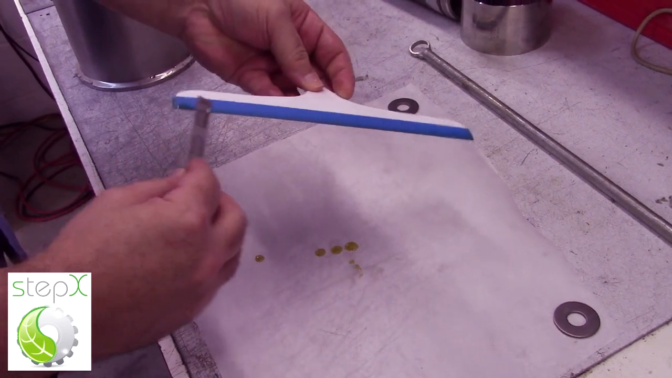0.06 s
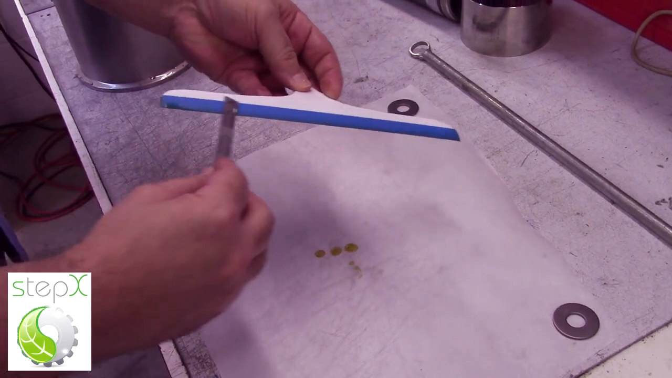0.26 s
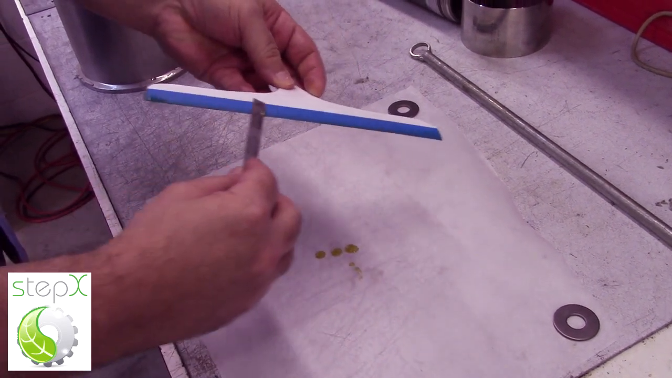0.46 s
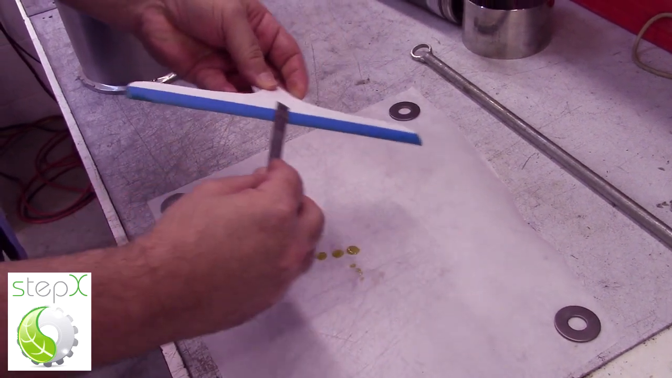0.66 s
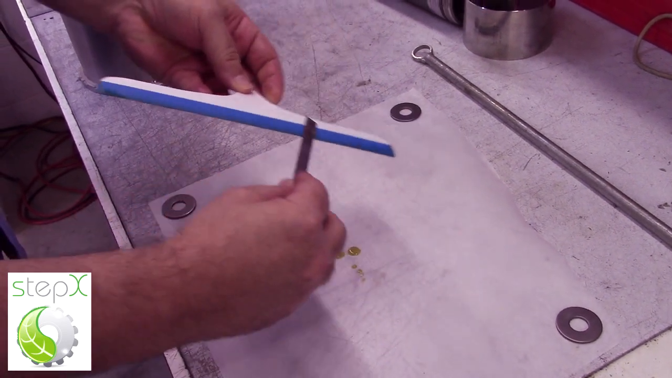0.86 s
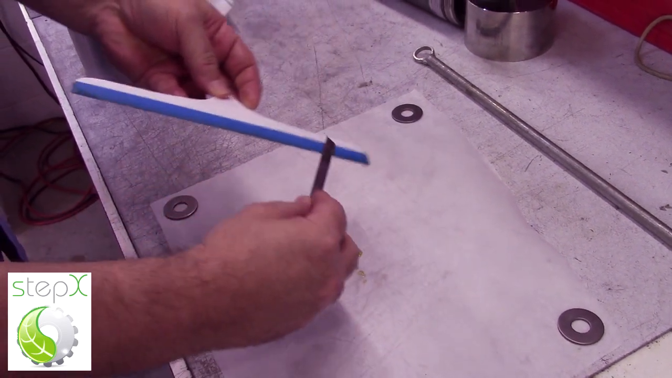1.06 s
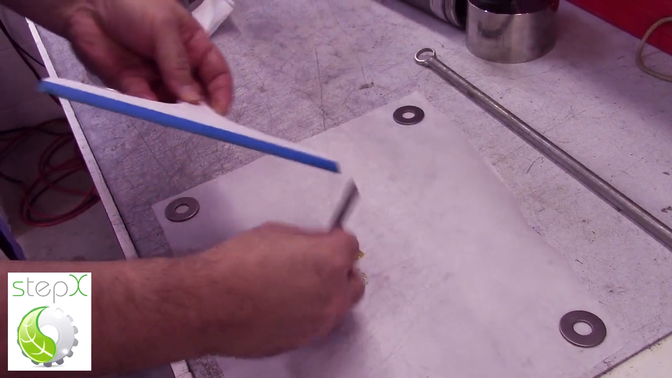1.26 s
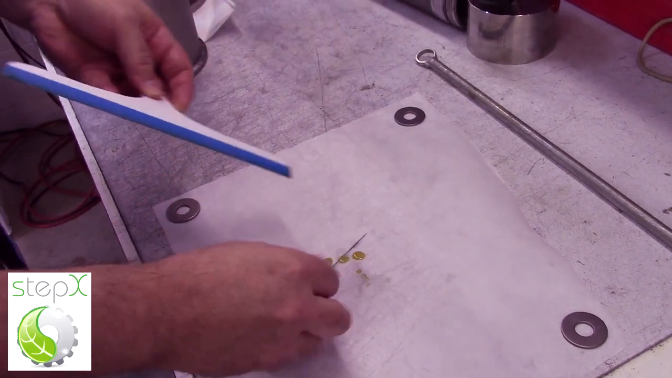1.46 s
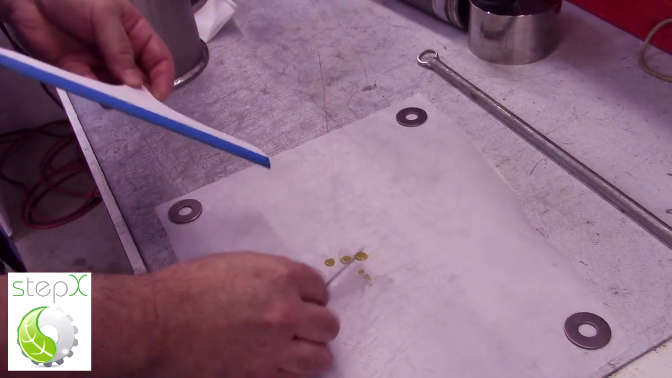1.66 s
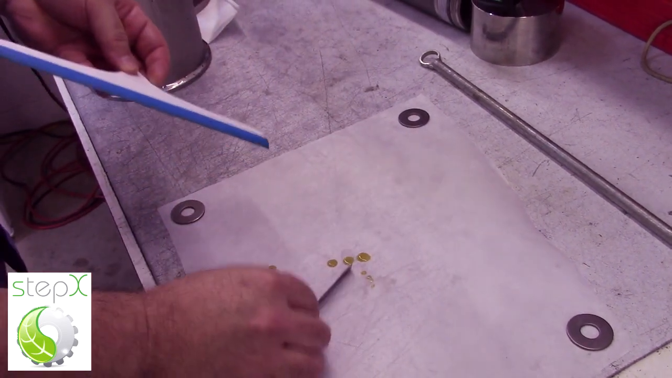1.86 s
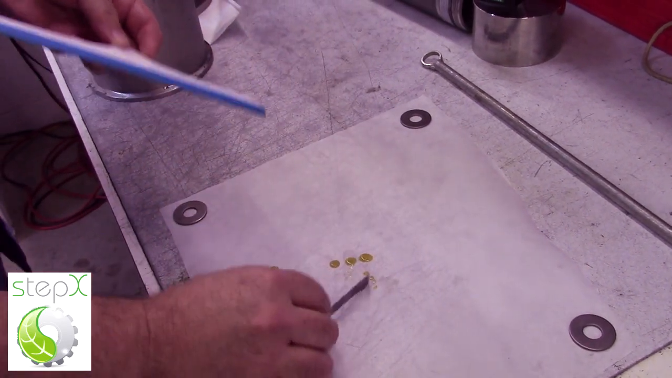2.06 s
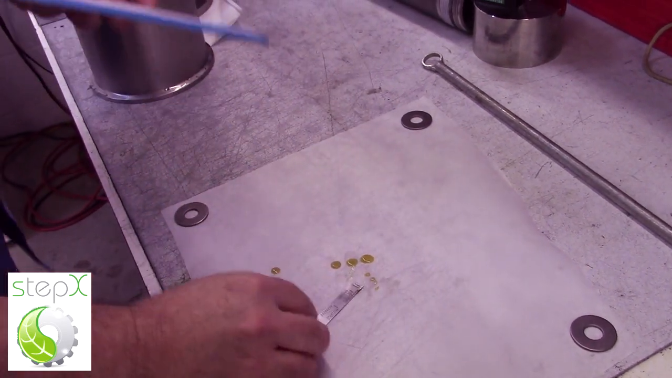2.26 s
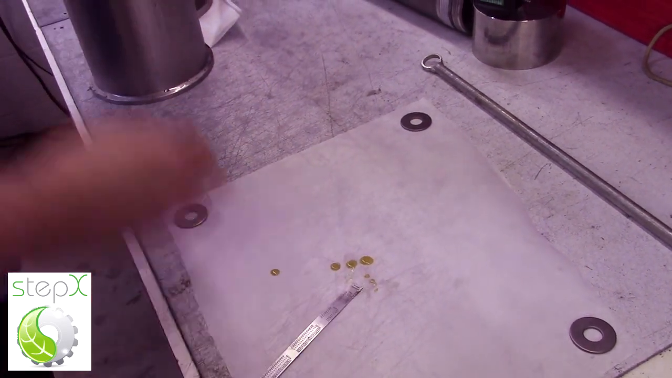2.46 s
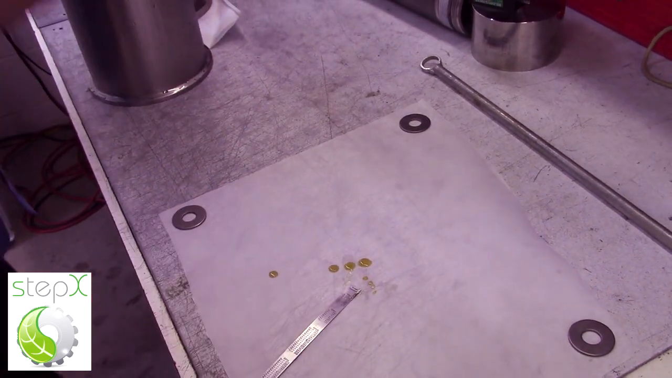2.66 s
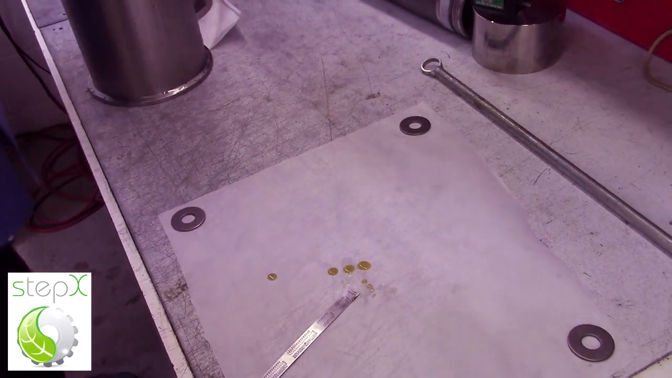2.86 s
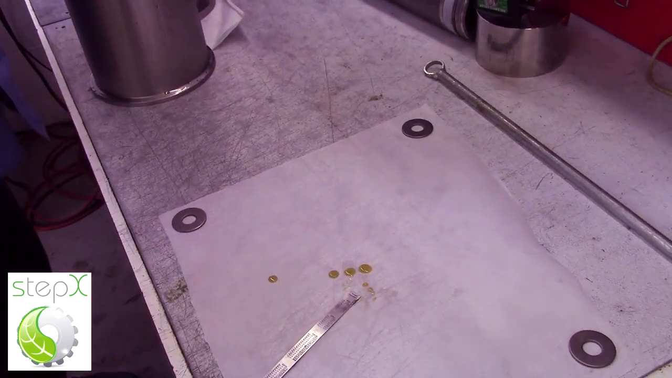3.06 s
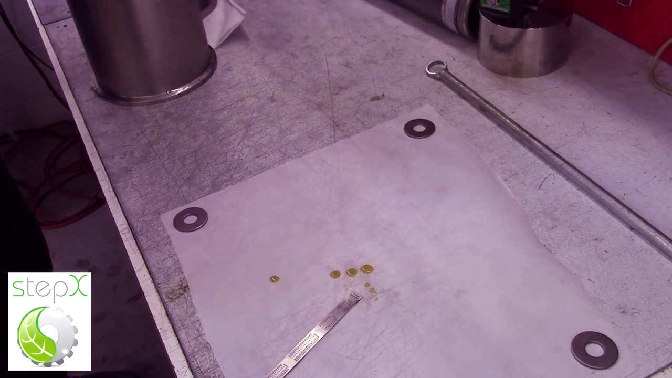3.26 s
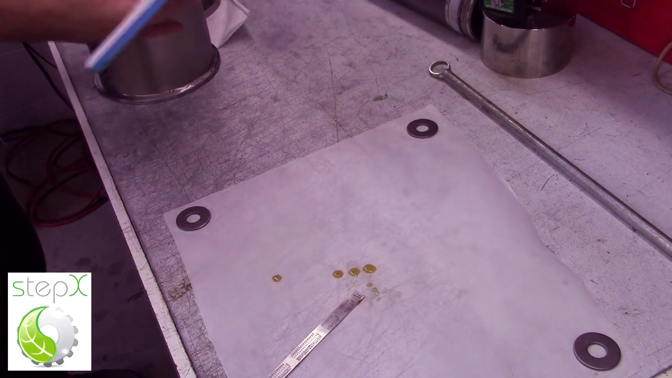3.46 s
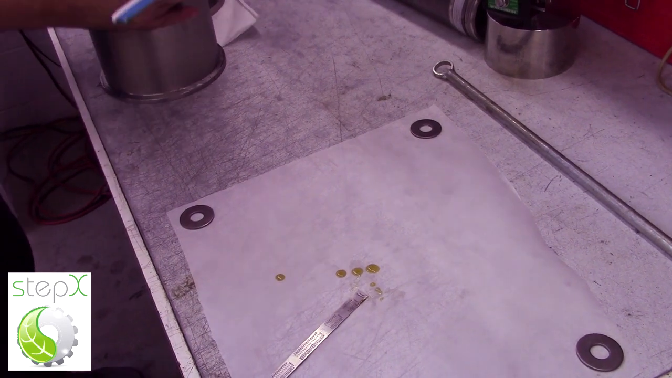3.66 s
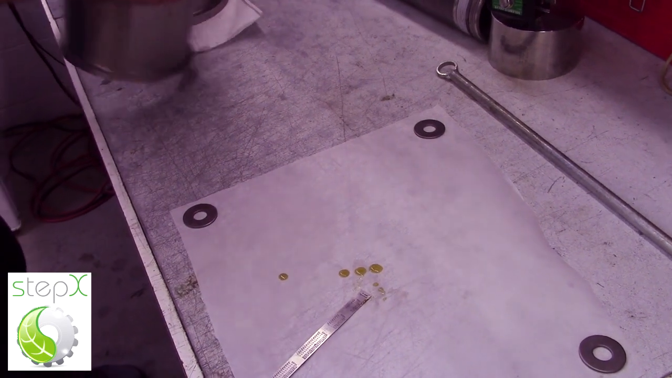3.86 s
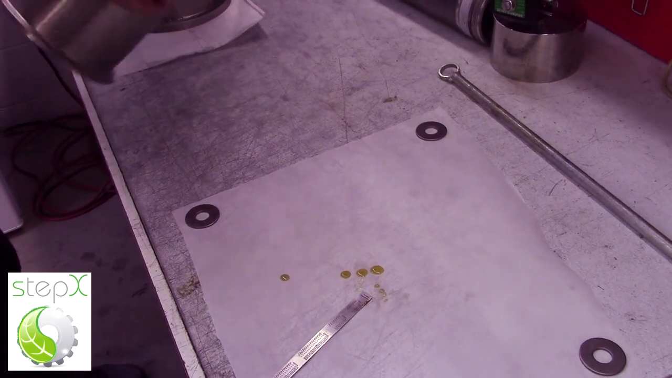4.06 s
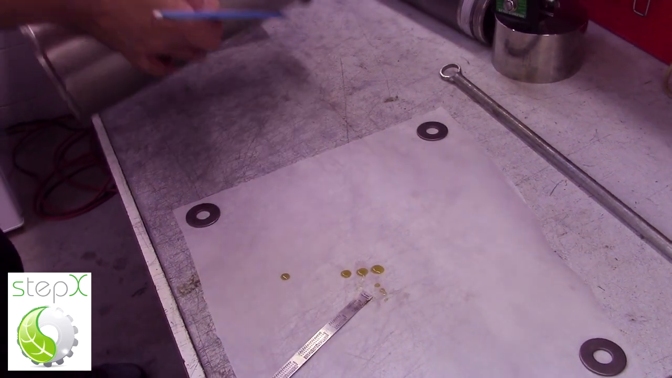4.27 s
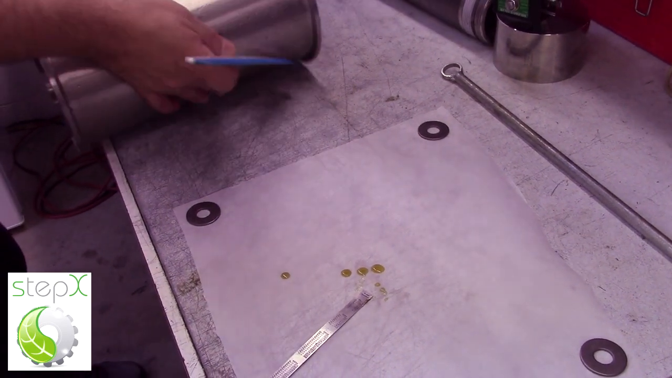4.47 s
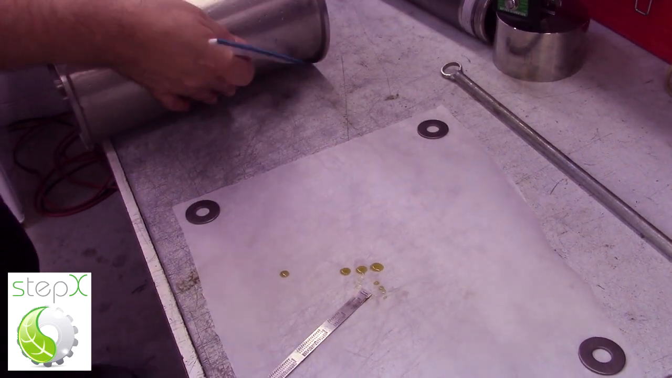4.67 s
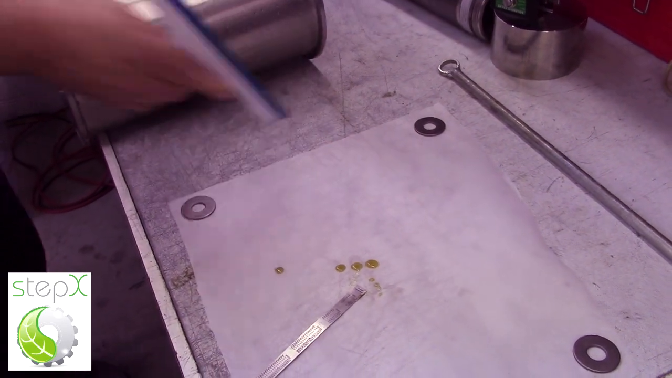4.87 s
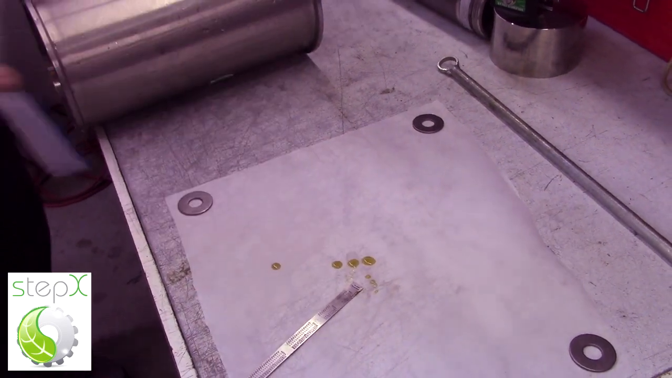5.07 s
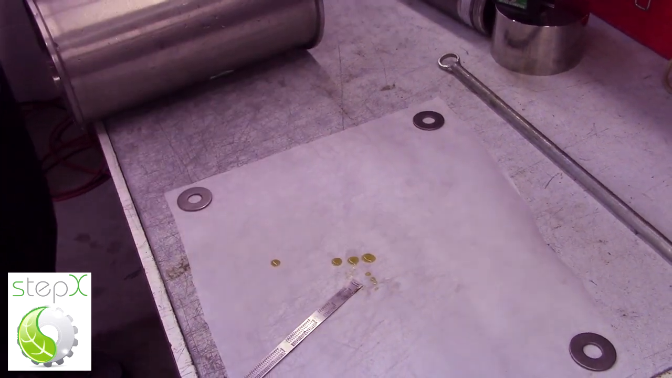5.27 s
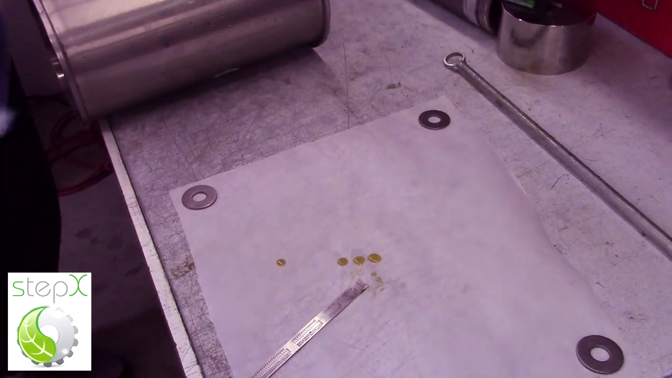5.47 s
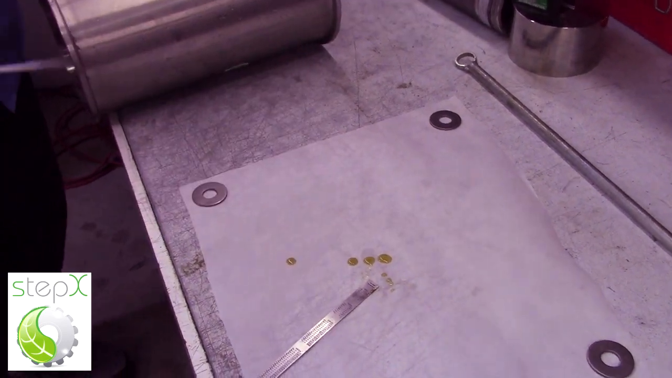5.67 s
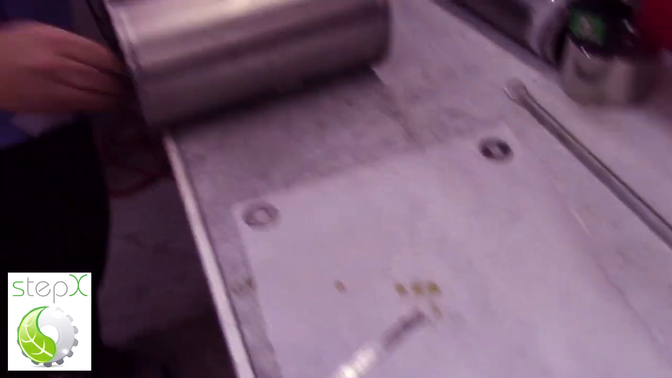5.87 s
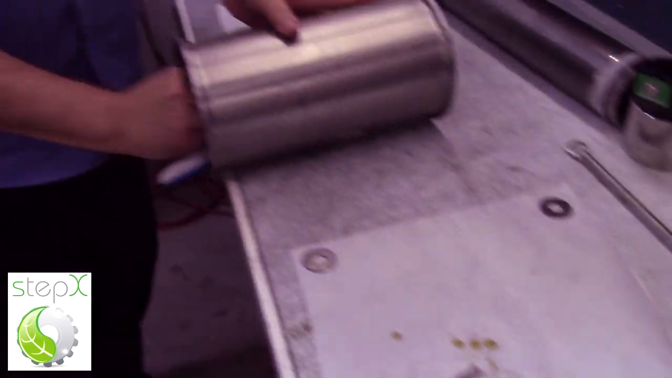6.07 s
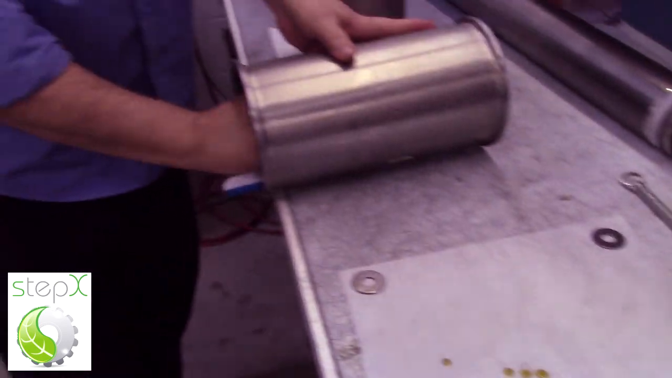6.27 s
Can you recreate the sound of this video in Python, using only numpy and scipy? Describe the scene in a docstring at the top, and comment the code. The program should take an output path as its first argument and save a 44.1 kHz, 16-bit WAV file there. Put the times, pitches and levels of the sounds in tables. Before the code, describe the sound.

A close stereo microphone catches a blade rubbing quietly along a squeegee, then dropping in several dry, bright taps on a metal bench. After a pause of sleeve friction and soft handling rumble, a hollow stainless vessel gives a brief ringing clink and comes down heavily, its bright clank joined by a deep sheet-metal boom. Small ticks and bumps follow over ventilation, hum and a rising motor, with short diffuse room echoes.

```python
"""Steel blade and vessel in a workshop

A thin steel blade is wiped on a squeegee (uneven friction noise) and dropped on a paper-covered metal worktop,
where it clatters (clicks, decaying modes, noise). A stainless steel vessel is picked up, clinks (wall modes) and
is laid on its side with a clank that makes the worktop boom (low modes, noise). Diffuse echoes of a small
workshop, ventilation noise, hum and a motor gathering speed surround it; the microphone is close."""
import sys
import numpy as np
from scipy import signal
from scipy.fft import rfft, irfft, next_fast_len
from scipy.io import wavfile
from scipy.ndimage import uniform_filter1d

SR = 44100
rng = np.random.default_rng(int(sys.argv[2]) if len(sys.argv) > 2 else 0)


def materialize(psi):
    """Save the field psi as 16-bit PCM at rate SR to the path in sys.argv[1].

    A 1-D psi becomes a single channel; in a 2-D psi each row is a channel.
    """
    bounded = np.clip(np.atleast_2d(psi).T, -1, 1)
    quanta = np.round(bounded * 32767).astype(np.int16)
    wavfile.write(sys.argv[1], SR, quanta)


N = 278271
TIME = np.arange(N) / SR
SHORT, MEDIUM, LONG = SR // 5, SR * 3 // 5, SR * 6 // 5  # sound lengths in samples: 0.2, 0.6, 1.2 s

# stereo width of close sounds: f/Hz, side minus mid level/dB
CLOSE_WIDTH = [(30, -22), (150, -25), (500, -17), (2000, -14), (8000, -10), (14000, -8)]
# modes of the vessel wall: f/Hz, level/dB, t60/s before the ring length factor
VESSEL_MODES = [(1120, -20, .2), (1717, -12, .42), (2356, -12, .3), (2419, 0, .17), (2424, -13, .36),
                (3225, -14, .36), (3273, -18, .26), (3545, -17, .22), (3946, -21, .3), (4093, -7, .16),
                (4388, -8, .22), (4720, -4, .15), (4957, -5, .15), (5110, -6, .12), (5846, -7, .16),
                (6169, -17, .22), (6304, -11, .15), (6627, -14, .16), (6800, -15, .15), (7564, -15, .17),
                (7790, -18, .2), (8750, -17, .13), (9227, -19, .15), (9480, -13, .11), (10390, -23, .18),
                (11120, -16, .11)]


def from_db(db):
    """Decibels to amplitude."""
    return 10 ** (np.asarray(db) / 20)


def rms_one(x):
    """Scale to an rms of 1."""
    return x / np.sqrt(np.mean(x ** 2) + 1e-20)


def at_hz(points, hz):
    """Read a table on a log-frequency axis."""
    known_hz, values = np.transpose(points)
    return np.interp(np.log(np.maximum(hz, 1)), np.log(known_hz), values)


def add(out, s, sound):
    """Mix a sound in at time s."""
    start = round(s * SR)
    out[:, start:start + sound.shape[-1]] += sound[..., :N - start]


def panned(x, left_db):
    """Make the left channel left_db louder against the right."""
    return x * from_db(np.array([[left_db], [-left_db]]) / 2)


def dying(t60, size):
    """Envelope that loses 60 dB in t60 seconds."""
    return np.exp(-np.log(1000) * TIME[:size] / t60)


def noise(colour, size=N, width=CLOSE_WIDTH):
    """Stereo noise of a given spectrum and of a width that depends on frequency; rms 1."""
    padded = next_fast_len(size, real=True)
    hz = np.fft.rfftfreq(padded, 1 / SR)
    mid, side = rfft(rng.standard_normal((2, padded))) * from_db(at_hz(colour, hz))
    side = side * from_db(at_hz(width, hz))
    left_right = irfft(mid + side * [[1], [-1]], padded)
    return rms_one(left_right[:, :size])


def puff(colour, t60):
    """Noise that starts at once and dies evenly."""
    return noise(colour, size=SHORT) * dying(t60, size=SHORT)


def burst(colour, decays, width=CLOSE_WIDTH, size=MEDIUM):
    """Countless modes struck at once: noise whose octaves die at their own rates."""
    spectrum = rfft(noise(colour, size=size, width=width))
    hz = np.fft.rfftfreq(size, 1 / SR)
    centres = 62.5 * 2 ** np.arange(9)
    out = 0
    for centre, own in zip(centres, np.eye(len(centres))):
        weight = at_hz(np.c_[centres, own], hz)  # 1 at its own centre, 0 at the neighbours
        band = irfft(spectrum * weight, size)
        out = out + band * dying(at_hz(decays, centre), size=size)
    return out


def ring(modes, spread_db, size, length=1, place=0):
    """One blow: decaying sines with scattered strengths, and signs set by the place struck."""
    hz, db, t60 = np.transpose(modes)
    level, side = rng.standard_normal((len(modes), 2)).T
    sign = np.sign(np.cos(np.pi * place * hz))
    strength = sign * from_db(db + spread_db * level)
    # high modes differ more between the channels
    balance = 1 + side * from_db(at_hz(CLOSE_WIDTH, hz)) * [[1], [-1]]
    sines = np.sin(2 * np.pi * hz[:, None] * TIME[:size])
    return (strength * balance) @ (sines * dying(t60[:, None] * length, size=size))


def radiate(x, corner_hz):
    """A plate hardly radiates waves longer than itself: a steep high-pass."""
    return signal.sosfilt(signal.butter(3, corner_hz, "high", fs=SR, output="sos"), x)


def strokes(rows, swell, release_s):
    """Strength of sliding movements: each swells over a share of its length, holds, then fades."""
    power = 0
    for start, length, db in rows:
        rise = np.clip((TIME - start) / (swell * length), 0, 1)
        fall = np.exp(-np.clip((TIME - start - length) / release_s, 0, 20))
        power = power + (from_db(db) * rise * fall) ** 2
    return np.sqrt(power)


def rubbing(strength, colour, grain_db):
    """Friction noise, made uneven by tiny catches and slips."""
    catches = rms_one(uniform_filter1d(rng.standard_normal(N), size=130))
    return strength * rms_one(noise(colour) * from_db(grain_db * catches))


def machines():
    """Ventilation noise with a softened treble, a steady hum of a few sines, and a motor."""
    # hum: f/Hz, rms level/dB
    hum_tones = [(75.4, -81), (242.2, -70), (360.7, -75), (479.1, -73)]
    # spectrum of the ventilation: f/Hz, level per Hz/dB
    air_colour = [(12, -38), (20, -2), (32, -18), (70, 1.5), (141, -6.5), (240, -3), (268, -6.5), (355, -7),
                  (443, -12.5), (482, -8), (554, -12.5), (754, -13.5), (1150, -17.5), (3600, -24),
                  (15800, -32)]
    # stereo width of diffuse sound: f/Hz, side minus mid level/dB
    far_width = [(60, -8), (150, -1.5), (380, 2.5), (950, 3), (2380, 1), (5980, 0), (15000, -1)]
    air_db = -54.5  # rms ahead of the low-pass
    low_pass = signal.butter(1, 14000, fs=SR, output="sos")
    air = signal.sosfilt(low_pass, from_db(air_db) * noise(air_colour, width=far_width))
    hum = sum(from_db(db) * np.sin(2 * np.pi * (hz * TIME + rng.random())) for hz, db in hum_tones)
    return air + np.sqrt(2) * (hum + motor())  # sqrt(2): rms to peak of a sine


def motor():
    """Unbalance grows with the square of the speed and shakes the mounting once and twice a turn."""
    # resonances of the mounting, which swell as the speed sweeps through them:
    # f/Hz, half-width at half amplitude/Hz, level/dB
    mounting = [(36.2, 2.8, -52), (61.55, 1.73, -48.5), (69.5, 2.6, -63.5), (97.7, 4.4, -48.5),
                (116.8, 8.8, -46.5), (131.6, 1.6, -57)]
    start_s, top_hz, lag_s = .625, 80.5, 1.7  # start, final turns per second, time constant
    second_order_db = -6
    speed = 1 - np.exp(-np.maximum(TIME - start_s, 0) / lag_s)  # share of top speed
    out = 0
    for order, order_db in enumerate((0, second_order_db), 1):
        shake_hz = order * top_hz * speed
        power = 0
        for hz, width, db in mounting:
            power = power + from_db(db) ** 2 / (1 + ((shake_hz - hz) / width) ** 2) ** 2
        shaking = np.sin(2 * np.pi * np.cumsum(shake_hz) / SR)
        out = out + from_db(order_db) * np.sqrt(power) * shaking
    return speed ** 2 * out


def sleeve():
    """Cloth friction: a sleeve brushes past as the hand reaches over, above a constant faint rustle."""
    # strokes: start/s, length/s, level/dB
    passes = [(2.45, 0.73, -64), (3.09, 0.0058, -54.5), (3.135, 0.05, -56), (3.352, .008, -47.5),
              (3.36, 0.041, -44), (3.45, 0.31, -62.5)]
    # spectrum of the cloth: f/Hz, level per Hz/dB
    cloth_colour = [(120, -30), (200, -19.5), (253, 2.5), (333, -7.5), (798, -6), (1190, -13.5),
                    (1510, -18), (2060, -10), (5000, -12.5), (8350, -17.5), (9660, -20.5), (11400, -21),
                    (15500, -38)]
    rustle_db = -66  # clothes never lie quite still
    strength = np.hypot(from_db(rustle_db), strokes(passes, swell=.65, release_s=0.058))
    return rubbing(strength, cloth_colour, grain_db=2.0)


def wipe():
    """Rubber friction: the blade is wiped along the squeegee, pressing harder until it slips off."""
    # strokes: start/s, length/s, level/dB
    wipes = [(.1, .95, -66.5), (.62, .32, -61.5), (1.165, 0.068, -53.5), (1.47, 0.051, -71)]
    # spectrum of the wiping: f/Hz, level per Hz/dB
    rubber_colour = [(400, -20), (1200, -5), (1900, -10), (2600, -7), (3100, 2), (3800, -7), (6000, -12),
                     (10000, -17), (16000, -30)]
    return rubbing(strokes(wipes, swell=0.89, release_s=0.0083), rubber_colour, grain_db=1.0)


def blade(rattle_db=-16, rattle_t60=0.063, click_low_hz=2400, click_high_hz=6000):
    """Each bounce is a hard click, a short clack and a brief edge chatter, all starting together."""
    # bounces: t/s, clack level/dB, click level/dB, chatter level before halving/dB, chatter t60/s
    taps = [(1.719, -8.5, -19, -23.5, 0.038), (1.735, -49, -37, -33, 0.12), (1.8821, -8.5, -20, -22, 0.05),
            (1.8865, -26, -12, -24, 0.019), (1.8910, -12, -0.5, -11.5, 0.023),
            (2.0804, -18.5, -37, -40, .03), (2.1429, -58, -38, -29, 0.019),
            (2.1523, -28, -11, -12.5, 0.015), (2.1565, -13.5, -33, -39, .05),
            (2.2265, -28, -30, -23.5, 0.085)]
    # modes of the blade lying against the sheet: f/Hz, level/dB, t60/s
    blade_modes = [(617, -30, 0.081), (1122, -30.5, 0.075), (1774, -18, 0.062), (1800, -32, 0.11),
                   (2025, -17, 0.026), (2190, -12, 0.014), (2384, -14, 0.023), (3043, -12.5, 0.016),
                   (3670, -15, 0.019), (4520, -18, 0.006), (5350, -13.5, 0.0058)]
    # short rattle of the sheet under the blade: f/Hz, level per Hz/dB
    rattle_colour = [(100, -25), (350, -55), (600, 3), (850, -15), (1300, -8), (1850, 8), (2600, -10),
                     (3500, -1.5), (5500, -12), (15000, -55)]
    # edge chatter: f/Hz, level per Hz/dB
    chatter_colour = [(150, -20), (500, -5.5), (1000, -7.5), (2500, 5.5), (5000, -8.5), (8000, 0),
                      (11000, -9.5), (16000, -17)]
    out = np.zeros((2, N))
    band_pass = signal.butter(1, [click_low_hz, click_high_hz], "band", fs=SR)
    click = signal.lfilter(*band_pass, signal.unit_impulse(SHORT))
    click = click / click.max()
    for s, clack_db, click_db, chatter_db, chatter_t60 in taps:
        clack = ring(blade_modes, spread_db=0.5, size=SHORT)
        clack = clack + from_db(rattle_db) * puff(rattle_colour, rattle_t60)
        add(out, s, radiate(from_db(click_db) * click + from_db(clack_db) * clack, corner_hz=550))
        add(out, s, from_db(chatter_db) * puff(chatter_colour, chatter_t60) / 2)
    return panned(out, left_db=-2.0)


def handling():
    """A hollow rumble of uneven friction as the vessel is reached for, tipped and carried."""
    # movements: start/s, length/s, level/dB
    moves = [(2.55, 0.92, -64.5), (3.61, 0.13, -57), (3.84, .35, -57)]
    # spectrum of the rumble: f/Hz, level per Hz/dB
    hollow_colour = [(100, -42), (200, -3.5), (290, 4), (400, -1.5), (700, -17), (1500, -49), (5000, -67.5)]
    return rubbing(strokes(moves, swell=0.29, release_s=.07), hollow_colour, grain_db=3.0)


def bumps(skirt_db=-28):
    """Soft handling bumps: dull, damped touches of noise, each about an octave wide."""
    # bumps: t/s, level/dB, centre f/Hz
    touches = [(2.787, -45.5, 293), (2.891, -40.5, 317), (2.899, -56, 900), (3.095, -47, 600),
               (3.781, -45.5, 540), (4.313, -46, 651), (4.852, -48, 284), (6.054, -46.5, 1940),
               (6.268, -44.5, 220)]
    cycles, base_t60 = 18, .02  # t60 is a fixed time (s) plus so many cycles: low ones ring longer
    out = np.zeros((2, N))
    for s, db, hz in touches:
        colour = [(hz / 4, skirt_db), (hz / 1.3, 0), (hz * 1.3, 0), (hz * 4, skirt_db), (hz * 16, 2 * skirt_db)]
        add(out, s, from_db(db) * puff(colour, base_t60 + cycles / hz))
    return out


def singing_wall(rows, colour):
    """Friction makes the damped wall sing faintly in its lower modes: noise through their ringing."""
    damped_wall = ring(VESSEL_MODES, spread_db=1, size=SHORT, length=.45)
    wall = signal.oaconvolve(noise(colour), damped_wall, axes=1)[:, :N]
    return strokes(rows, swell=0.37, release_s=0.042) * rms_one(wall)


def fingers():
    """Fingers slide on the vessel wall, then hold it; their friction excites the wall modes."""
    # slides: start/s, length/s, level/dB
    slides = [(3.53, 0.22, -61.5), (3.8, .3, -67.5)]
    # friction on the wall: f/Hz, level per Hz/dB
    finger_colour = [(1000, -14), (1700, 0), (2400, -7), (3200, -10), (3550, 13), (4100, -12), (5200, -16),
                     (12000, -20)]
    return singing_wall(slides, finger_colour)


def vessel(contact_t60=0.02):
    """Each knock gives a short crack and sets the steel wall ringing; hand and worktop damp it."""
    # knocks: t/s, low modes level/dB, high modes level/dB, contact noise level before halving/dB,
    # ring length factor/1
    knocks = [(4.1236, -32, -37.5, -28, 1.13), (4.213, -69, -49.5, -50, 0.65),
              (4.5056, -34, -32, -7.5, .92), (4.548, -42.5, -46, -24, 1.36), (4.859, -75, -60, -60, 0.4),
              (5.0929, -57.5, -48, -37.5, 1.54)]
    # contact noise: f/Hz, level per Hz/dB
    contact_colour = [(300, -31), (1200, -12), (2200, 9), (4500, -4.5), (7500, -9.5), (11000, -22.5),
                      (16000, -23.5)]
    out, upper = np.zeros((2, N)), high_modes()
    for s, low_db, high_db, contact_db, length in knocks:
        low = ring(VESSEL_MODES, spread_db=1.5, size=MEDIUM, length=length, place=rng.random())
        high = ring(upper, spread_db=3.0, size=SHORT, length=length, place=rng.random())
        add(out, s, from_db(low_db) * low)
        add(out, s, from_db(high_db) * high)
        add(out, s, from_db(contact_db) * puff(contact_colour, contact_t60) / 2)
    return panned(radiate(out, corner_hz=800), left_db=-1)


def high_modes(count=200):
    """The crowded upper modes of the thin wall, scattered in pitch and strength: f/Hz, level/dB, t60/s."""
    # overall spectrum of these modes: f/Hz, level per Hz/dB
    shimmer_colour = [(300, -26), (1200, -12), (2000, -6.5), (4600, -2.5), (7000, -1), (11000, -1),
                      (16000, -22)]
    # their decay: f/Hz, t60/s before the ring length factor
    shimmer_t60 = [(1000, 0.36), (4000, 0.24), (14000, 0.14)]
    hz = rng.uniform(2600, 14500, count)
    scatter_db = 4 * rng.standard_normal(count)
    db = at_hz(shimmer_colour, hz) + scatter_db - 10 * np.log10(count)  # power shared among them
    return np.c_[hz, db, at_hz(shimmer_t60, hz)]


def worktop(pressing_db=-30):
    """The weight of the vessel presses the metal top in, then makes it boom and rattle."""
    # landings: t/s, boom level/dB, sheet rattle level before halving/dB
    landings = [(4.5053, -12.5, -12), (4.557, -46, -29)]
    # modes of the worktop: f/Hz, level/dB, t60/s
    top_modes = [(102, -16, .4), (122, -15, .3), (158, -11, .25), (181, -17, .2), (205, -8, .18),
                 (222, 0, .27), (243, 0, .22), (270, -2, .2), (290, -3, .18), (308, 1.5, .22),
                 (346, -2, .24), (412, -9, .25), (524, -9, .2), (565, -16, .25), (694, -15, .52),
                 (742, -21, .45), (780, -12, .14), (895, -10, .12), (1030, -10, .09), (640, 2, .012),
                 (950, 1, .008), (258, -22, 1.3), (279, -18, 1.05), (322, -19, .8), (388, -19, .6),
                 (196, -29, 1.4)]
    # crowded modes of the sheet: f/Hz, level per Hz/dB
    sheet_colour = [(30, -25), (70, -4), (160, -7), (300, 3), (500, -0.5), (900, 1.5), (1400, -5),
                    (2500, -5.5), (5000, -19), (14000, -47)]
    # their decay: f/Hz, t60/s
    sheet_t60 = [(60, 0.52), (300, 1), (600, 0.21), (1000, 0.17), (2500, 0.12), (10000, 0.049)]
    first_touch_s = 4.4985  # the rim touches just before the full weight lands
    out = np.zeros((2, N))
    add(out, first_touch_s, from_db(pressing_db) * puff(sheet_colour, t60=0.036))
    for s, boom_db, rattle_db in landings:
        boom = radiate(ring(top_modes, spread_db=3.5, size=LONG), corner_hz=156.4)
        add(out, s, from_db(boom_db) * boom)
        add(out, s, from_db(rattle_db) * burst(sheet_colour, sheet_t60) / 2)
    return panned(out, left_db=-1.0)


def rolling_rim():
    """After landing, the rim rolls a little on the worktop; its friction excites the wall modes."""
    # rolls: start/s, length/s, level/dB
    rolls = [(4.57, .1, -49), (4.71, 0.029, -53)]
    # friction at the rim: f/Hz, level per Hz/dB
    rim_colour = [(1000, -3), (1700, 1), (2400, -11.5), (3200, -3.5), (3550, -2), (4400, -14), (5500, -13),
                  (12000, -11.5)]
    return singing_wall(rolls, rim_colour)


def workshop(x, wet_db, build_s=0.0084):
    """Diffuse reflections build up shortly after the direct sound and fade."""
    # spectrum of the echo: f/Hz, level/dB
    room_colour = [(100, -24.5), (500, 11), (2000, -0.5), (6000, -1.5), (15000, -2.5)]
    # decay of the echo: f/Hz, t60/s
    room_t60 = [(100, 0.45), (500, 0.39), (2000, 0.33), (6000, 0.4), (14000, 0.14)]
    # stereo width of the echo: f/Hz, side minus mid level/dB
    room_width = [(100, -18), (400, -21), (1000, -9.5), (3000, -6.5), (12000, -4)]
    build_up = 1 - np.exp(-(TIME[:MEDIUM] / build_s) ** 2)
    echo = burst(room_colour, room_t60, width=room_width) * build_up
    echo = echo / np.sqrt(np.sum(echo ** 2) / 2)  # unit energy per channel on average
    return x + from_db(wet_db) * signal.oaconvolve(x, echo, axes=1)[:, :N]


def scene():
    """Blows in the room, quiet handling sounds, machines behind."""
    background = machines()
    friction = sleeve() + wipe() + handling() + fingers() + rolling_rim()
    knocks = workshop(blade() + bumps() + vessel(), wet_db=-17)
    boom = workshop(worktop(), wet_db=-20)
    return background + friction + knocks + boom


def record(dry):
    """Loud peaks are rounded off by a tanh curve and the top is cut by a steep low-pass."""
    rounded = 1.337 * np.tanh(dry / 1.354)
    low_pass = signal.ellip(10, .1, 80, 15800, fs=SR, output="sos")  # 0.1 dB ripple, 80 dB stop, Hz
    return signal.sosfilt(low_pass, rounded)


dry = scene()
out = record(dry)
materialize(out)
```